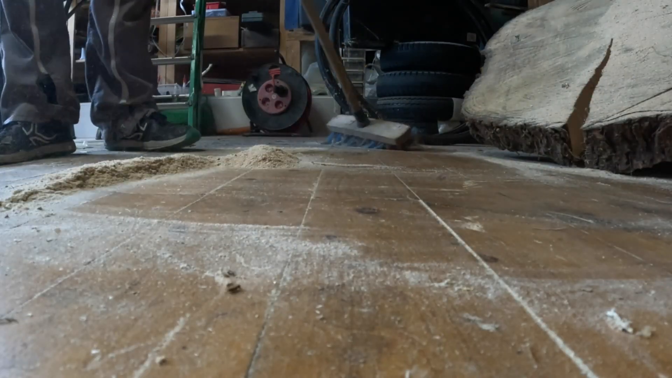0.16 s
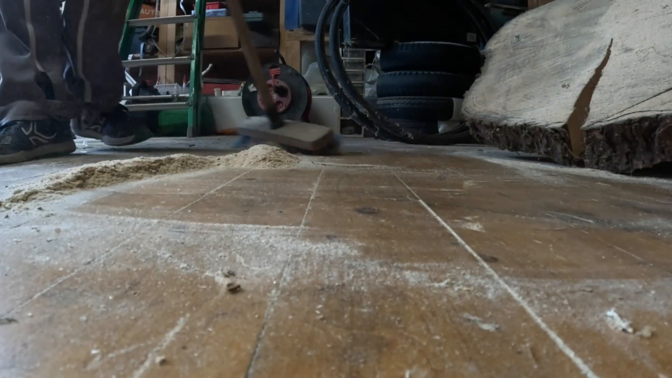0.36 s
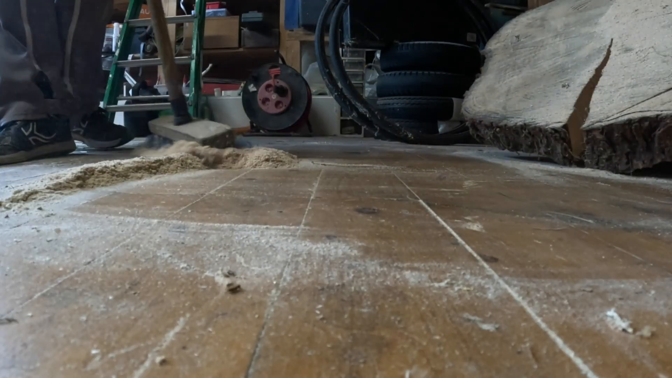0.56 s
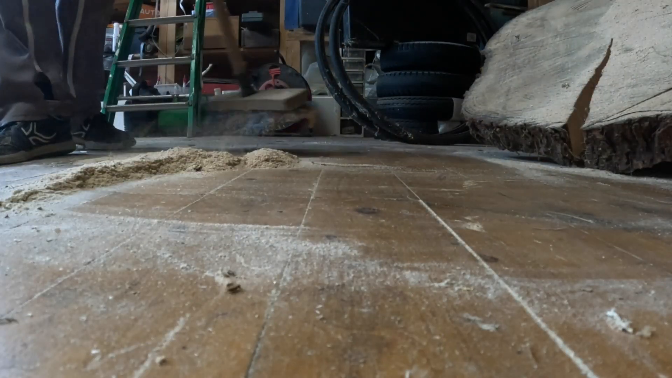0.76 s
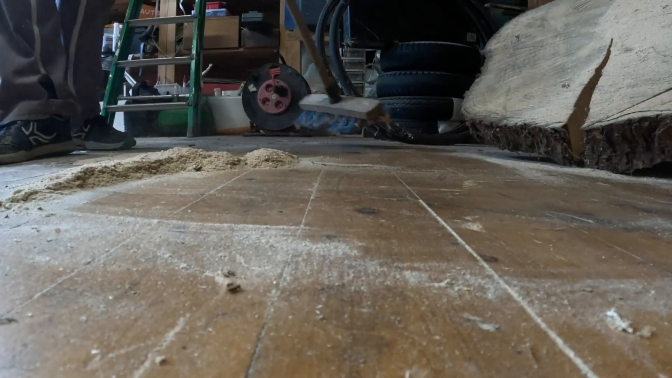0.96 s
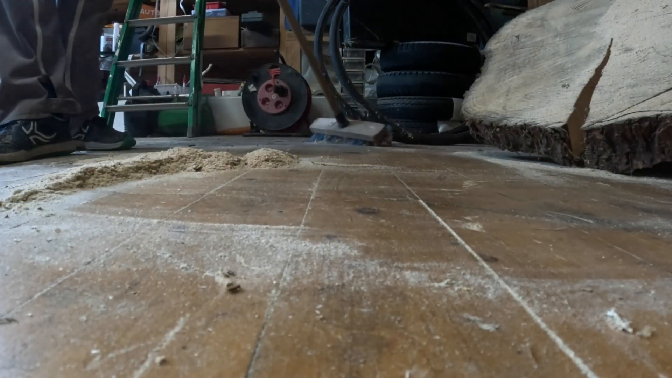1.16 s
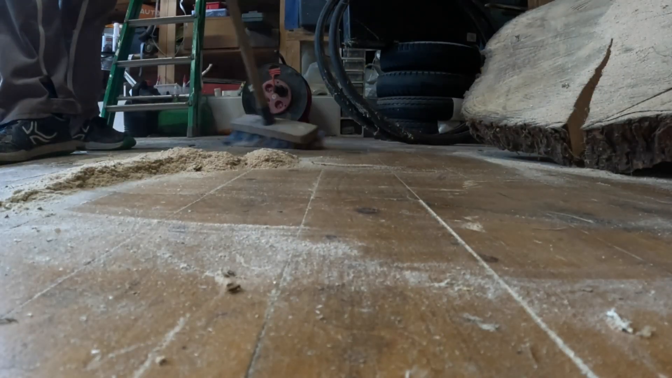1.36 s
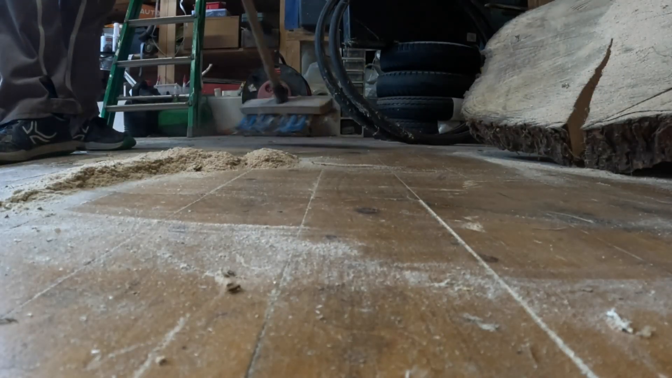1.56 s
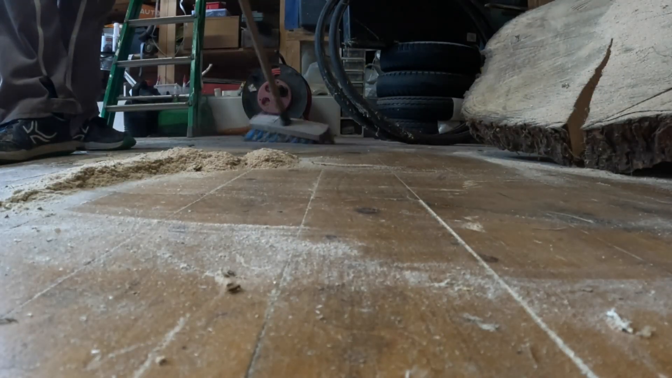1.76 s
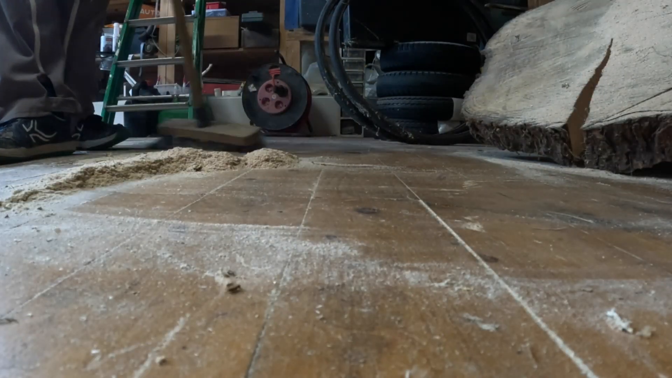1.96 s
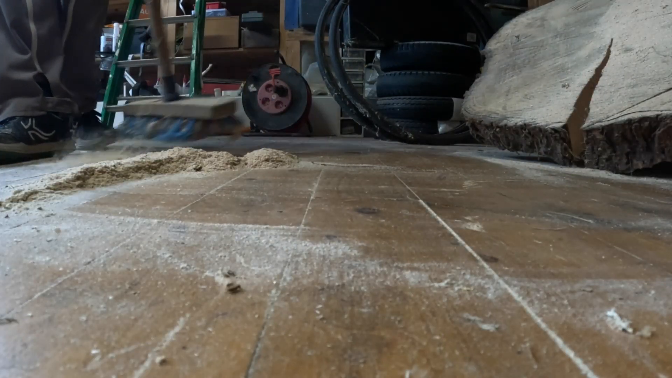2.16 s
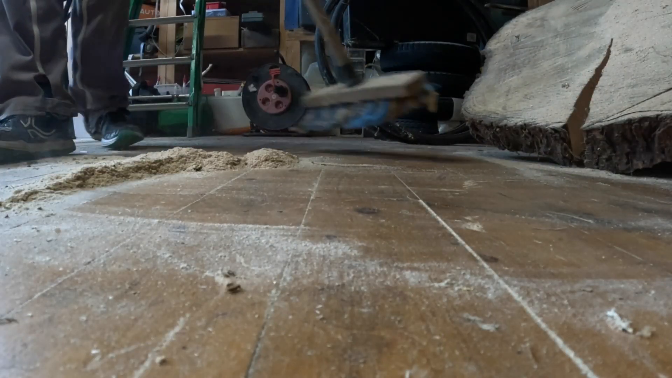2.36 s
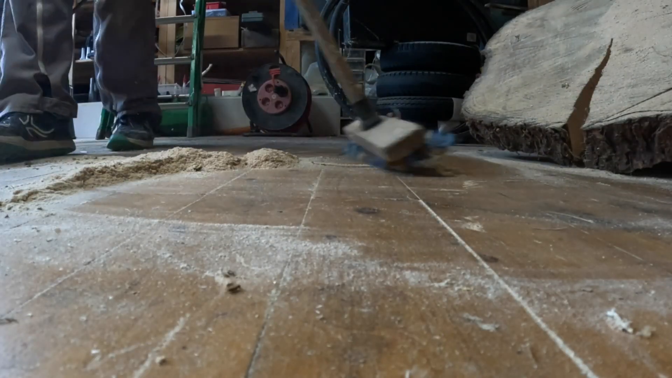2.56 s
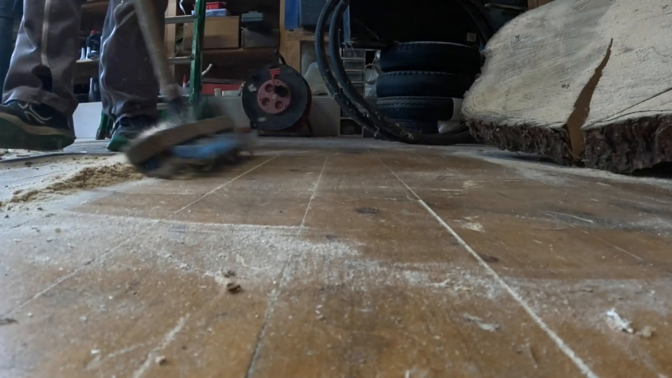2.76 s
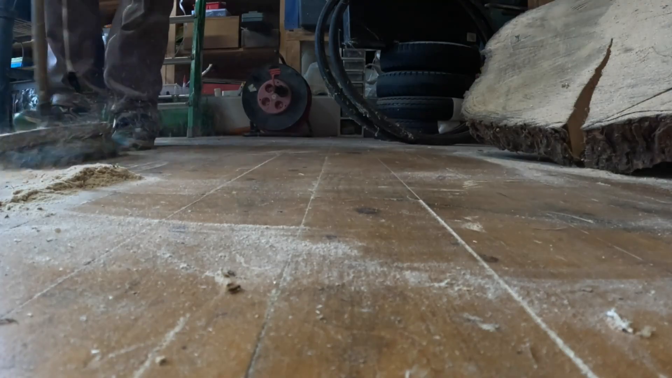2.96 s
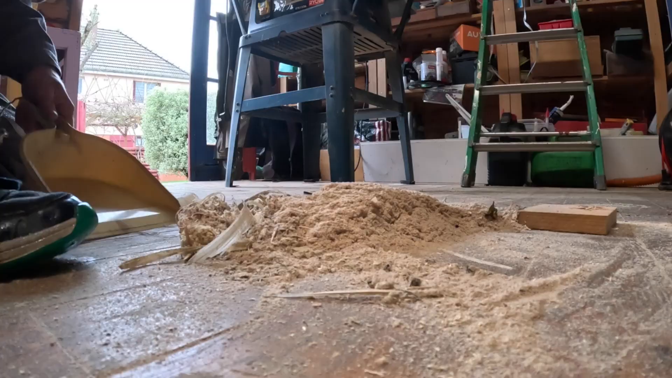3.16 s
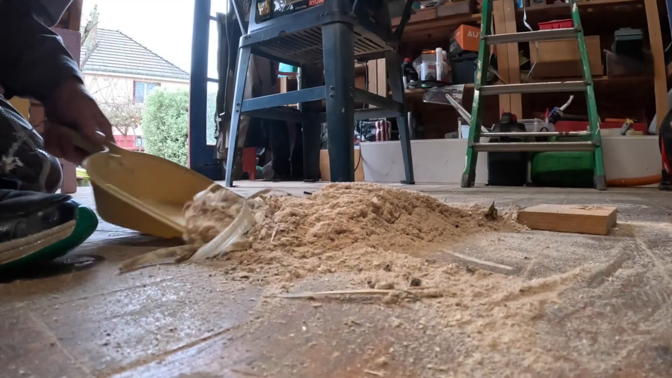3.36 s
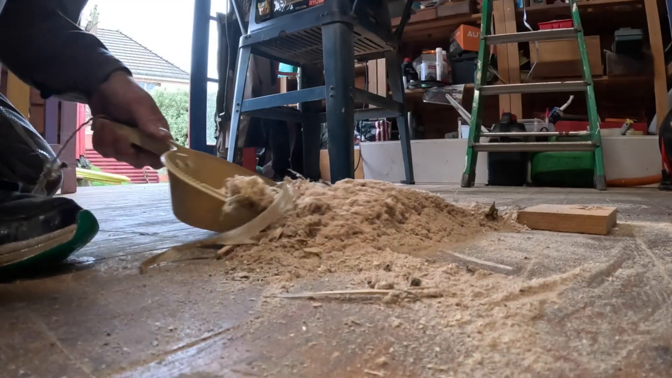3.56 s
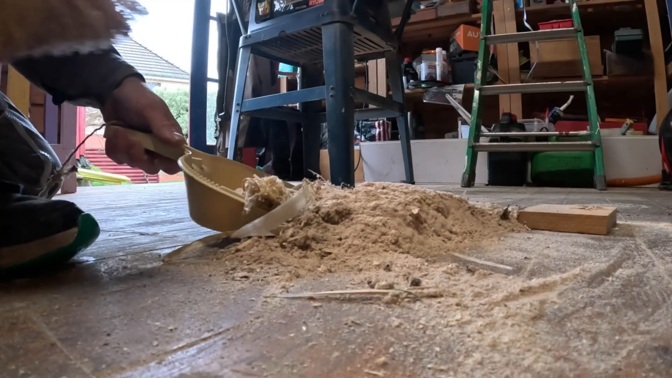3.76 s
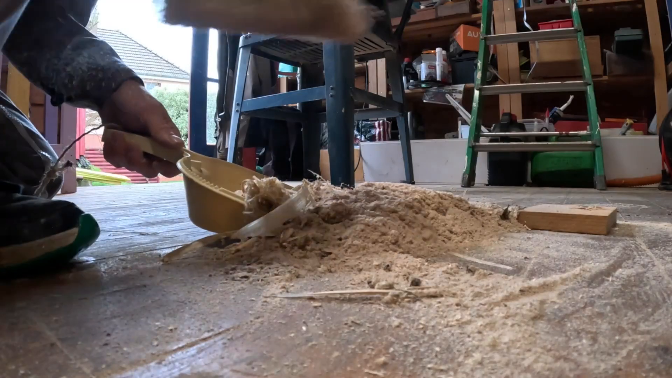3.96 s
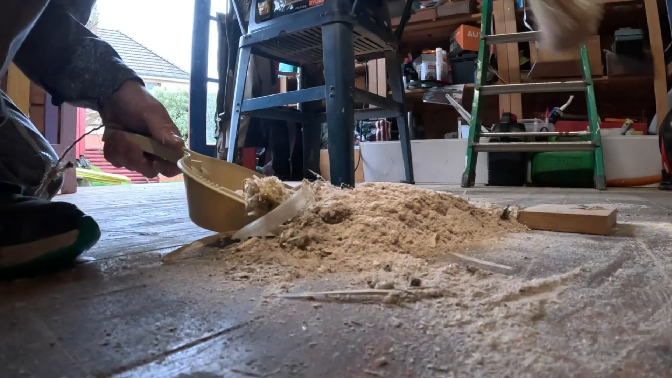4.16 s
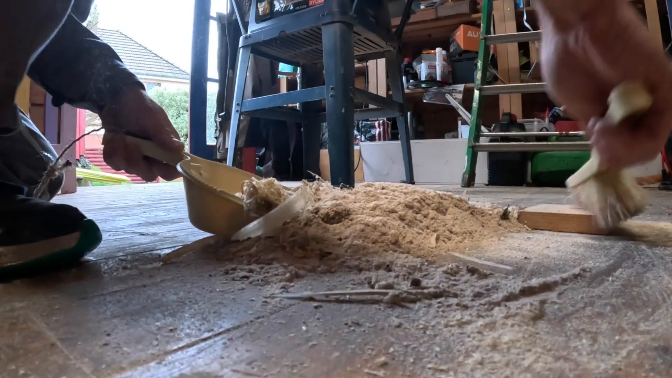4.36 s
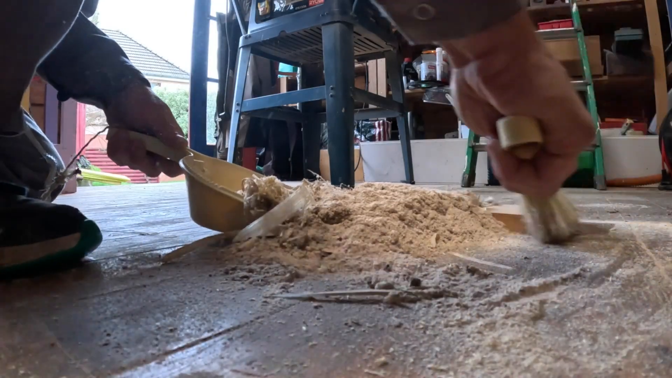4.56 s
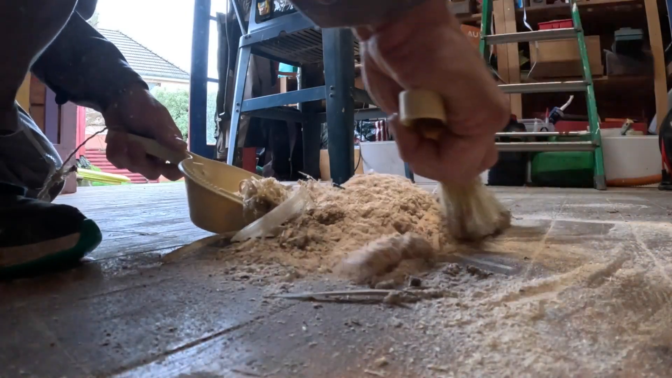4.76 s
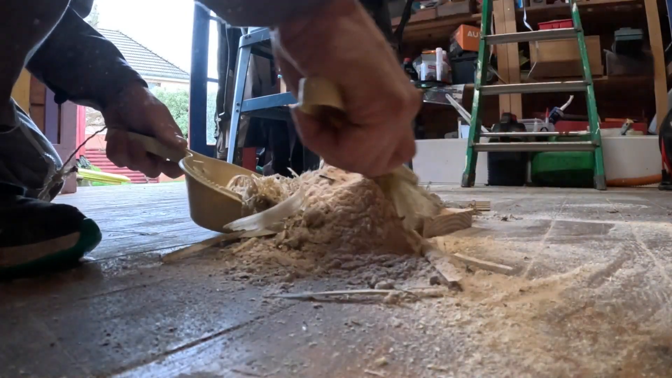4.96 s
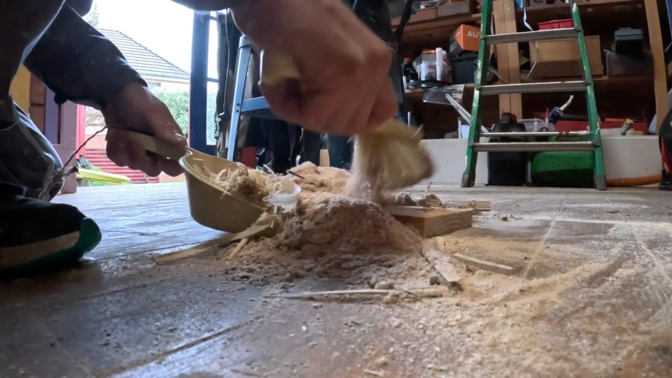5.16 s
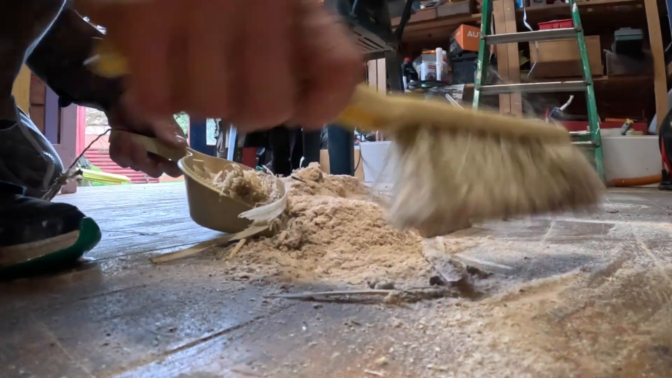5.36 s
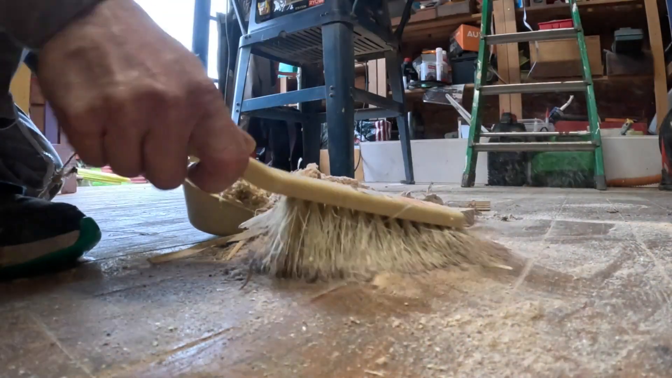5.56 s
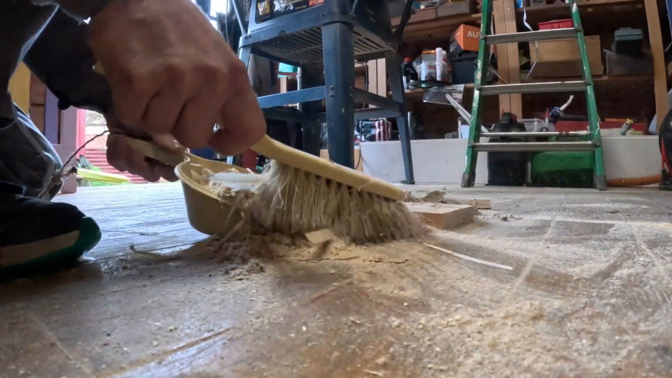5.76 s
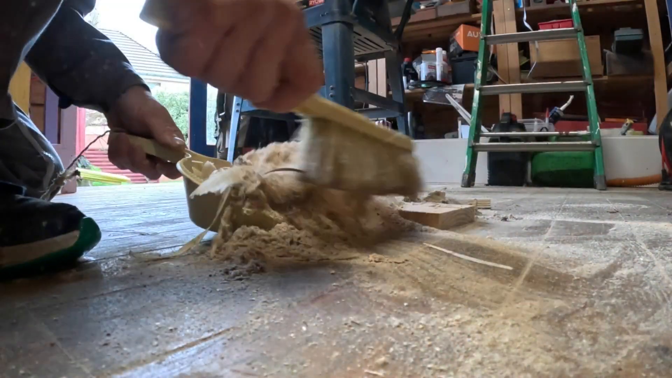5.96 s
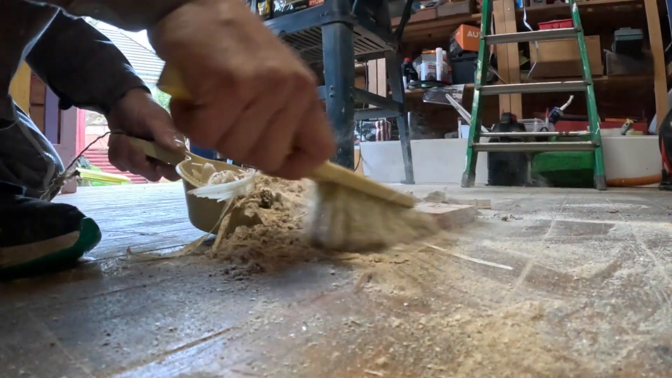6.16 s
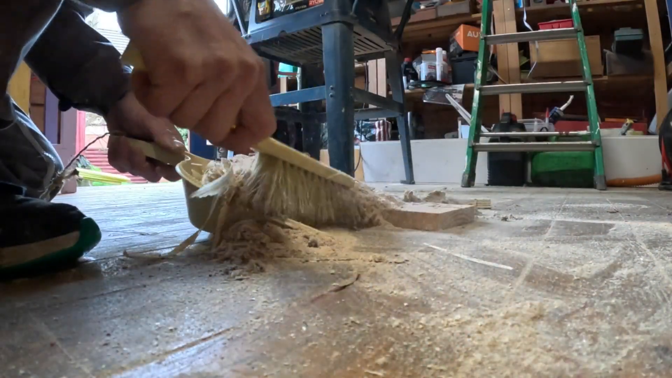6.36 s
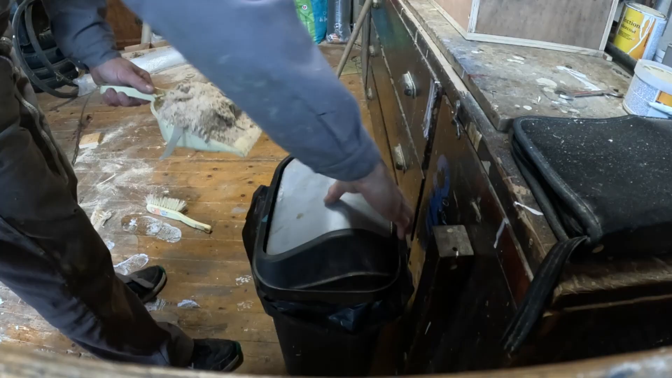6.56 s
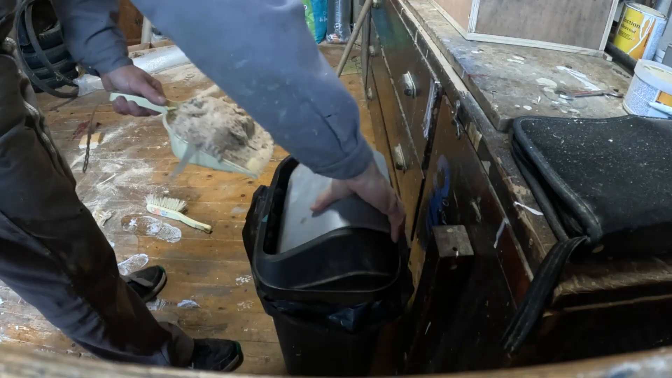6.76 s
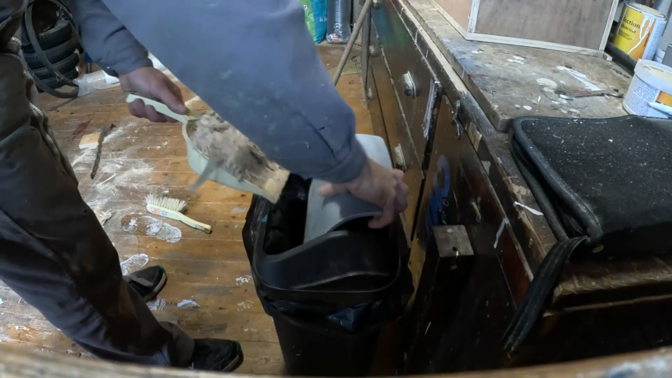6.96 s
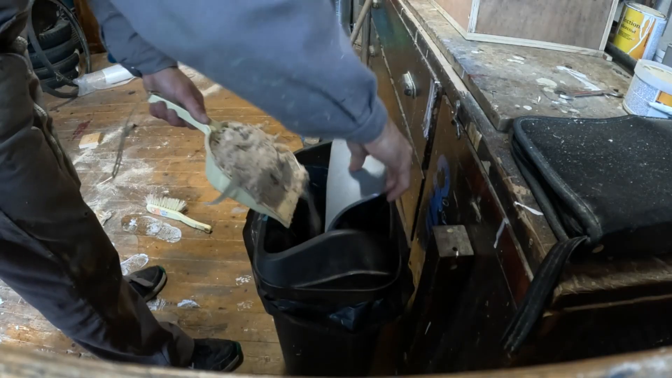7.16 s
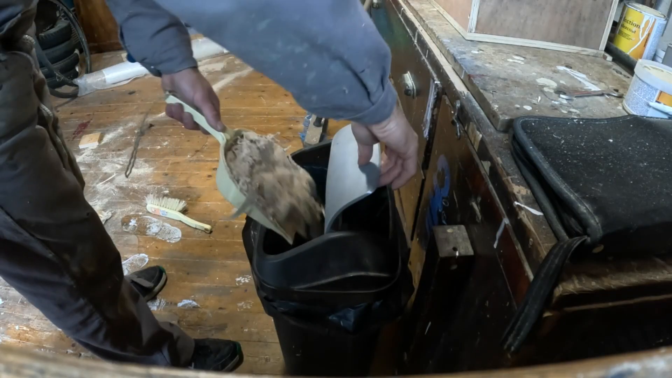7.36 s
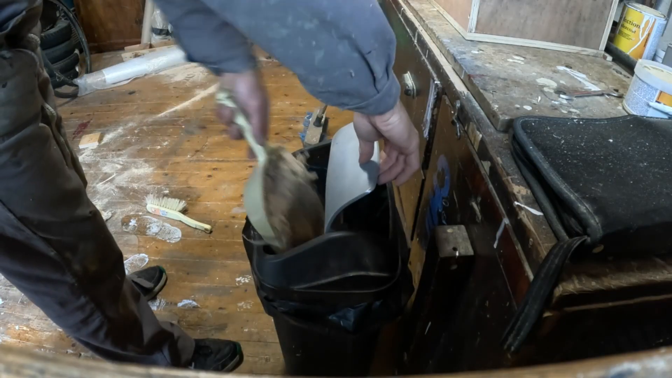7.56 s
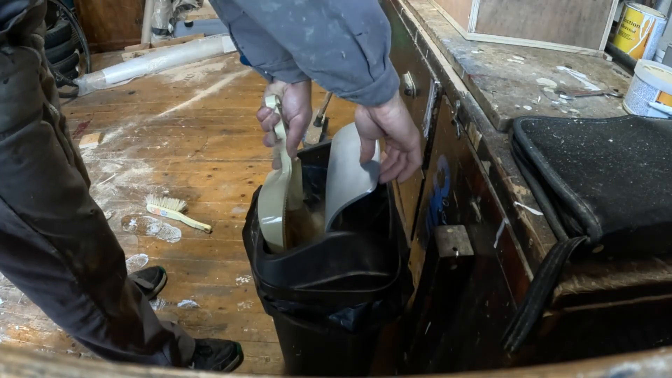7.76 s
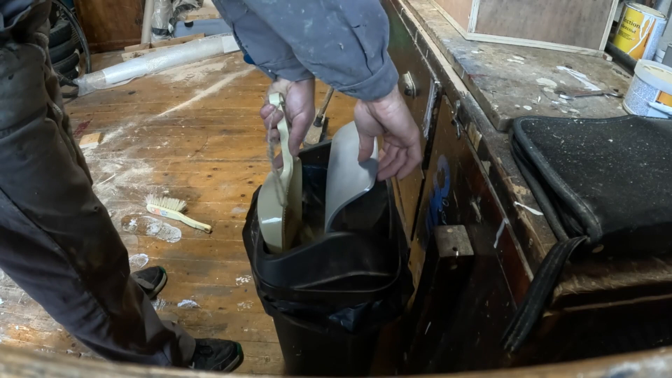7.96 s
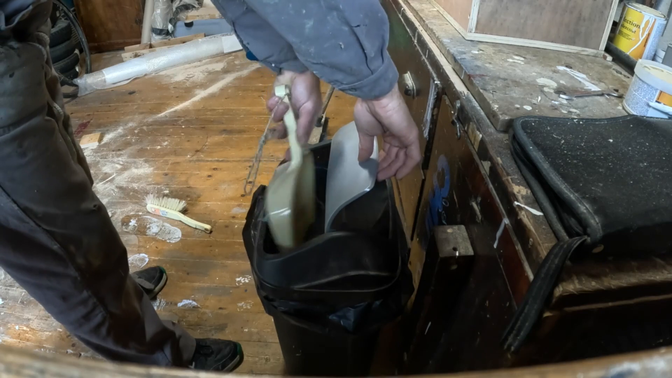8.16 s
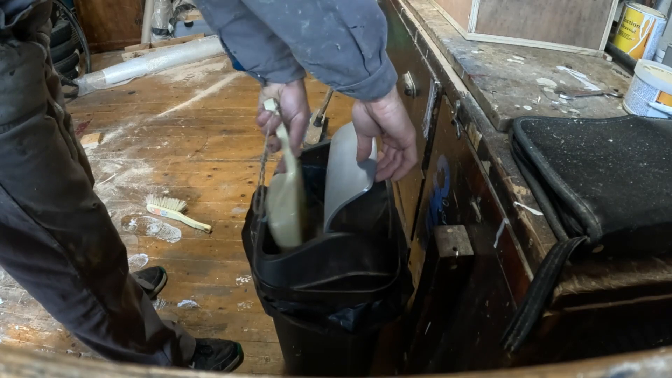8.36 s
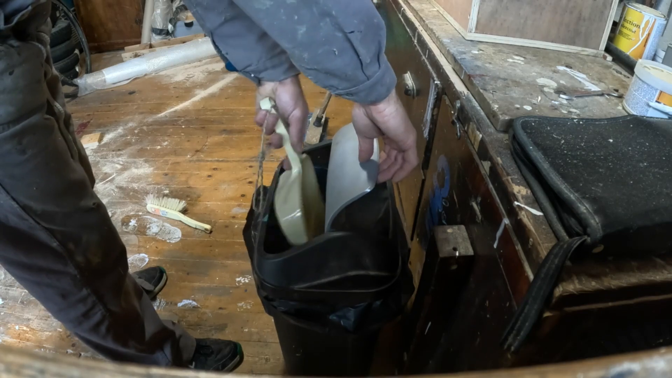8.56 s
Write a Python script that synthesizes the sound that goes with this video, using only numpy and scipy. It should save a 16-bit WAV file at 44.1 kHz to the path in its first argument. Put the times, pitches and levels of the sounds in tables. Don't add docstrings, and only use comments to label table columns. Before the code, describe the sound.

Coarse sweeping over wooden floorboards, a hollow dustpan scrape, dragging wood and soft brushing, then sawdust slides into a bin and two hard taps ring out.

```python
import sys
import numpy as np
from scipy import signal
from scipy.fft import rfft, irfft, next_fast_len
from scipy.io import wavfile
from scipy.ndimage import uniform_filter1d

SR = 44100
rng = np.random.default_rng(int(sys.argv[2]) if len(sys.argv) > 2 else 0)


def wav_record(signal):
    frames = np.transpose(np.atleast_2d(signal))
    bounded = np.clip(frames, -1, 1)
    quanta = np.round(bounded * 32767).astype(np.int16)
    wavfile.write(sys.argv[1], SR, quanta)


def volts_from_db(level):
    exponent = np.asarray(level, float) / 20
    return 10 ** exponent


N = 383475

# touch t/s, build-up t/s, hold t/s, lift-off t/s for 20 dB, pressure level/dB
BROOM_STROKES = [
    (-0.07, 0.037, .34, .15, -26),
    (-.08, .16, .04, .2, -23.5),
    (0.91, 0.22, 0.0037, 0.1448, -22),
    (1.525, .13, .15, .15, -24),
    (2.271, .002, .04, .06, -32),
    (2.265, 0.18, .2, 0.0756, -21.5),
    (2.3, 0.096, .39, 0.13, -28),
    (-0.02, 0.043, 2.67, 0.33, -42),
]
# f/Hz, level/dB per Hz
BROOM_TONE = [(88, -17.5), (150, 7), (786, -12), (1710, -11.5), (2210, -16), (6970, -15.5), (12500, -34.5),
              (15800, -58)]
# f/Hz, width f/Hz, strength level/dB
BROOM_HEAD = [(990, 140, -4.5), (1340, 200, -17.5), (1657, 31, -11), (3610, 160, -15)]


def broom():
    return rub(0, BROOM_STROKES, BROOM_TONE, BROOM_HEAD, slips_per_s=2500, spread_db=3.5, grit=0.8,
               judder_db=1.4, wide=0.45, patchy_db=2.0)


# touch t/s, build-up t/s, hold t/s, lift-off t/s for 20 dB, pressure level/dB
PAN_SHOVES = [
    (3.249, .001, 0.019, .05, -27.5),
    (3.28, .06, .1, 0.29, -10),
    (3.584, 0.0035, .02, .16, -15.5),
]
# f/Hz, level/dB per Hz
SHOVE_TONE = [(88, -33), (150, -9), (250, -5), (756, -12.5), (1440, -7), (2000, -15), (5740, -22),
              (15800, -56)]
# f/Hz, width f/Hz, strength
# level/dB
SHOVE_MODES = [(237, 42, -11), (955, 83, -11), (1380, 24, -12.5), (1470, 13, -7), (1730, 110, -16),
               (2500, 120, -28), (3300, 500, -8)]


def dustpan():
    return rub(1, PAN_SHOVES, SHOVE_TONE, SHOVE_MODES, slips_per_s=1200, spread_db=4, grit=0.9,
               judder_db=1.5, wide=0.25, patchy_db=2.1)


# touch t/s, build-up t/s, hold t/s, lift-off t/s for 20 dB, pressure level/dB
OFFCUT_DRAGS = [
    (4.432, .002, .005, 0.12, -34),
    (4.49, .05, .01, .05, -33),
    (4.541, .008, .02, 0.1, -22),
    (4.598, .004, .37, .045, -21.5),
    (4.7, .004, .01, .1, -22),
    (4.96, .02, .03, .1, -36),
]
# f/Hz, level/dB per Hz
DRAG_TONE = [(88, -40), (150, -8.5), (239, -2.5), (291, -2), (650, -16.5), (3020, -37), (9530, -48),
             (15800, -78)]
# f/Hz, width f/Hz, strength level/dB
OFFCUT_MODES = [(178, 33, -3.5), (240, 23, 0), (440, 82, -12), (1780, 47, -5), (2930, 180, -6),
                (3900, 160, -21)]


def offcut():
    return rub(2, OFFCUT_DRAGS, DRAG_TONE, OFFCUT_MODES, slips_per_s=1200, spread_db=3.5, grit=0.7,
               judder_db=1.5, wide=0.3, patchy_db=2.1)


# touch t/s, build-up t/s, hold t/s, lift-off t/s for 20 dB, pressure level/dB
BRUSH_STROKES = [
    (4.98, .06, .15, .06, -41),
    (5.2, .1, .25, .1, -50),
    (5.52, 0.096, 0.086, .13, -30),
    (5.75, .05, .14, 0.13, -42.5),
    (6.158, 0.062, 0.054, .35, -37.5),
]
BRUSH_RETURNS = [
    (5.8, 0.13, 0.0092, .07, -35),
    (6.094, 0.0018, 0.0023, 0.024, -31.5),
    (6.27, 0.089, 0.0079, 0.063, -21.5),
    (6.4, .05, .15, .05, -40),
]
# f/Hz, level/dB per Hz
BRUSH_TONE = [(88, -37), (150, -13), (235, -7), (502, -14.5), (1210, -9), (7540, -20.5), (12500, -32),
              (15800, -61)]
# f/Hz, width f/Hz, strength level/dB
BOARD_MODE = [(236, 18, -22)]


def hand_brush():
    return rub(3, BRUSH_STROKES, BRUSH_TONE, BOARD_MODE, slips_per_s=1500, spread_db=4, grit=0.7,
               judder_db=1.5, wide=0.35, patchy_db=2.1)


def hand_brush_returns():
    return rub(4, BRUSH_RETURNS, BRUSH_TONE, BOARD_MODE, slips_per_s=1500, spread_db=4, grit=0.7,
               judder_db=1.5, wide=0.3, patchy_db=2.1)


# touch t/s, build-up t/s, hold t/s, lift-off t/s for 20 dB, pressure level/dB
LID_RUBS = [
    (6.62, 0.19, .12, .1, -41.5),
    (6.97, .035, 0.0042, .045, -24),
    (7.03, 0.022, 0.26, .2, -43),
    (7.482, .002, .005, .12, -33.5),
    (7.577, 0.0013, 0.0043, 0.072, -27.5),
]
# f/Hz, level/dB per Hz
LID_TONE = [(88, -45), (150, -8), (201, -5), (447, -14), (1070, -9.5), (7840, -23.5), (15800, -47)]


def bin_lid():
    return rub(5, LID_RUBS, LID_TONE, [], slips_per_s=1500, spread_db=3, grit=0.55,
               judder_db=1.2, wide=0.25, patchy_db=2.4)


# start t/s, build-up t/s, hold t/s, fade t/s for 20 dB, level/dB
POUR_SLIDES = [
    (7.6, 0.093, 0.0085, 0.24, -32),
    (7.87, 0.099, 0.0079, .11, -30),
    (7.48, 0.13, 0.66, 0.31, -43.5),
]
# f/Hz, level/dB per Hz
POUR_TONE = [(88, -33), (150, -8), (465, -10), (817, -5.5), (7390, -19.5), (13800, -38.5), (15800, -57)]


def pour():
    return rub(6, POUR_SLIDES, POUR_TONE, [], slips_per_s=1200, spread_db=4.5, grit=0.7,
               judder_db=1.5, wide=0.25, patchy_db=2.4)


# from t/s, to t/s
SPANS = [
    (0, 3.19),
    (3.24, 3.86),
    (4.42, 5.12),
    (5.0, 6.6),
    (5.75, 6.6),
    (6.6, 7.75),
    (7.45, 8.45),
]
# firm fizz level/dB, slope dB/dB, firm board ring level/dB, slope dB/dB
FOLLOW = [
    (-28.5, 1.2, -31, 0.77),
    (-43, 1.33, -38.5, 1.36),
    (-37.5, 0.6, -22.5, 0.77),
    (-24, 1.05, -30, 0.73),
    (-40, 0.53, -37, 0.23),
    (-40.5, 0.58, -39.5, 0.24),
    (-32, 0.82, -29, 0.85),
]
# t/s, build-up t/s, fade t/s for 20 dB, level/dB
THUDS = [
    [(.04, 0.034, 0.26, -19.5), (.35, .08, 0.5, -26.5), (1.12, 0.019, 0.11, -17.5), (2.38, 0.085, 0.5, -20)],
    [(3.425, 0.004, 0.21, -13)],
    [(4.434, 0.004, 0.07, -17), (4.5, .03, .1, -24), (4.93, .03, .2, -19), (4.543, .005, 0.04, -8.5),
     (4.598, 0.0029, 0.08, -8.5), (4.7, 0.0013, 0.06, -14.5)],
    [(5.66, 0.049, 0.1, -20)],
    [(6.158, .002, 0.35, -30.5)],
    [(6.75, 0.046, 0.4, -34.5), (7.482, 0.0034, 0.12, -25), (7.577, .002, 0.06, -17)],
    [],
]


def rub(index, rows, tone, modes, slips_per_s, spread_db, grit, judder_db, wide, patchy_db):
    span = SPANS[index]
    fizz_db, fizz_slope, ring_db, ring_slope = FOLLOW[index]
    t = np.arange(*span, 1 / SR)
    level_db = pushes(t, rows, lift=1.78)
    over_firm_db = level_db + 25
    fizz = volts_from_db(fizz_db + fizz_slope * over_firm_db)
    thud = volts_from_db(pushes(t, THUDS[index], lift=1))
    weight = np.hypot(volts_from_db(ring_db + ring_slope * over_firm_db), thud)

    def contact(share):
        hiss = rng.standard_normal(len(t))
        slipping = rng.random(len(t)) < slips_per_s / SR
        size = np.minimum(rng.exponential(1, len(t)), 3)
        slips = slipping * volts_from_db(spread_db * size) * np.sign(hiss)
        judder = volts_from_db(share * judder_db * wander(len(t), 0.015))
        drive = (hiss + share * grit * evened(slips)) * judder
        ringing = sum(volts_from_db(7.0 + db) * resonate(drive, hz, width) for hz, width, db in modes)
        return colour(drive + ringing, tone)

    def heard(x):
        throb = volts_from_db(judder_db * wander(len(t), 0.014))
        ring = weight * throb * evened(band(x, 100, 432))
        body = volts_from_db(level_db) * evened(band(x, 556, 2540))
        return body + fizz * evened(band(x, 2900, 18000)) + ring

    mid = heard(contact(1))
    side = wide * band(heard(contact(0.73)), 1500, 10500)
    ends = np.clip(np.minimum(t - t[0], t[-1] - t) * 1000, 0, 1)
    return span[0], clump(np.array([mid + side, mid - side]), patchy_db) * ends


def pushes(times, rows, lift):
    t = times[::16]
    power = np.full(len(t), 1e-9)
    for s, rise, *hold, fall, db in rows:
        gone = (t - s - rise - sum(hold)) / fall
        build = np.clip((t - s) / rise, 0, 1) ** (2 * 0.91)
        release_db = 40 * np.clip(gone, 0, 3) ** lift
        power = power + volts_from_db(2 * db - release_db) * build * (gone < 3)
    return np.interp(times, t, 10 * np.log10(power))


def clump(x, patchy_db):
    z = signal.stft(x, nperseg=256, noverlap=192)[2]
    patches = uniform_filter1d(rng.standard_normal(z.shape[1:]), 4, 0)
    patches = evened(uniform_filter1d(patches, 16, 1))
    return signal.istft(z * volts_from_db(patchy_db * patches), nperseg=256, noverlap=192)[1][:, :x.shape[1]]


# t/s, peak level/dB, ring length factor, brightness level/dB
TAPS = [
    (5.5, -21.5, 0.27, -4),
    (6.093, -20.5, 0.28, -5),
    (6.158, -17, 0.45, -3),
    (7.482, -20, 0.5, -18),
    (7.576, -16, 0.5, -13),
    (8.392, 3.5, 0.56, -2.5),
    (8.558, 4, 0.62, -3),
]
# f/Hz, level/dB per Hz
TAP_TONE = [(76, -27.5), (130, -0.5), (252, -5.5), (480, -12), (894, -8), (2590, -15.5), (7990, -29),
            (15800, -59)]
# f/Hz, level/dB, t60 t/s
BIN_MODES = [(229, -10, 0.5), (425, -9, .5), (608, -10, .4), (705, -8, .35), (788, -3, 0.6), (964, -8, .4),
             (1170, -6, 0.3), (1357, -9, .3), (1530, -8, 0.4), (1663, -8, .4), (1950, -4, 0.25),
             (2400, -8, 0.3), (2680, -7, 0.2), (3200, -9, .12)]


def tap(db, ring, bright_db):
    t = np.arange(SR // 2) / SR

    def dying(t60):
        return volts_from_db(-60 * t / (t60 * ring))

    noise = evened(colour(rng.standard_normal(len(t)), TAP_TONE))
    treble = band(noise, 2600, 16000)
    body = (noise - treble) * (dying(0.07) + 0.5 * dying(0.5))
    top = volts_from_db(bright_db) * treble * (1.6 * dying(0.09) + 0.3 * dying(0.45))
    rattle = (body + top) * volts_from_db(1.8 * wander(len(t), 0.0035))
    modes = 0
    for hz, mode_db, t60 in BIN_MODES:
        modes = modes + volts_from_db(mode_db) * dying(0.5 * t60) * np.sin(2 * np.pi * (hz * t + rng.random()))
    return volts_from_db(db - 5) * (rattle + 0.4 * modes) * np.minimum(t / 0.0008, 1)


# t/s, peak level/dB, f/Hz, hold t/s
CATCHES = [(.458, -14, 106, 0.023), (1.134, -16, 240, 0.025), (3.337, -15.5, 1380, 0.035),
           (3.34, -10, 237, .046), (3.38, -7.5, 1470, 0.026), (3.428, -5, 237, 0.051),
           (3.593, -7, 237, 0.03), (4.545, -5, 250, 0.02), (4.599, -3, 237, 0.0246),
           (4.895, -14, 182, 0.025), (4.698, -15, 440, 0.026), (5.688, -17, 236, 0.053),
           (6.982, -40, 1110, 0.03), (1.15, -17, 90, .05), (2.5, -21, 270, .04), (2.505, -11, 33, .09),
           (2.6, -8, 64, .035), (3.287, -14, 1450, .015), (3.32, -12, 1400, .02), (4.658, -11, 262, .02),
           (4.813, -16, 180, .02), (4.852, -12, 200, .03), (4.925, -12, 240, .02), (7.578, -18, 280, .04),
           (7.69, -32, 1400, .03)]


def catch(db, hz, hold):
    t = np.arange(8000) / SR
    fade_db = -60 * np.maximum(t - hold, 0) / 0.045
    swing = np.minimum(t / 0.004, 1) * volts_from_db(fade_db + 2.5 * wander(len(t), 0.005))
    turns = np.cumsum(hz * (1 + 0.046 * wander(len(t), 0.0031))) / SR
    return volts_from_db(db) * swing * np.sin(2 * np.pi * turns)


# t/s, peak level/dB, f/Hz, crack level/dB above it
TICKS = [(0.947, -16, 1230, -14), (0.968, -12, 1000, -20), (2.312, -15.5, 1700, -11),
         (2.452, -1.5, 1300, -36), (2.645, -6, 1304, -25), (3.293, 0, 1427, -29), (3.323, 4, 1365, -11),
         (3.43, -6, 1530, -30), (3.502, 0, 927, -25), (3.52, -2, 696, -11.5), (3.584, -2, 890, -26),
         (3.876, -21, 1030, -26), (4.433, -21, 1050, -1), (4.548, -9, 600, -36), (4.601, -7, 560, -40),
         (4.701, -6, 620, -40), (4.829, -10, 910, -17), (5.069, -26, 775, -2), (5.686, -9.5, 1620, -7),
         (5.751, -24, 750, -1), (5.779, -22.5, 1100, 2.5), (5.812, -24.5, 1420, 3.5),
         (5.898, -19, 1490, -11), (6.198, -14.5, 1000, -16), (6.457, -12.5, 1620, -22),
         (6.981, -17, 1120, -30), (7.969, -12.5, 855, -18)]


def tick(db, hz, crack_db):
    t = np.arange(4000) / SR
    puff, sharp = rng.standard_normal((2, len(t)))
    pitch = np.sin(2 * np.pi * hz * t)
    knock = (pitch + 0.66 * evened(band(puff, 333, 3400))) * volts_from_db(-60 * t / 0.057)
    crack = evened(band(sharp, 3100, 10000)) * volts_from_db(crack_db + 8.0 - 60 * t / 0.018)
    return volts_from_db(db - 10) * (knock + crack)


# t/s, peak level/dB, f/Hz
SNAPS = [(0.8834, -27, 4000), (1.5125, -27, 5500), (1.5429, -27, 4000), (2.0467, -30, 4500),
         (2.3121, -18, 3500), (3.25, -23, 2500), (3.5184, -8, 4500), (3.8117, -31, 4000),
         (4.375, -35, 4000), (4.5595, -22, 4000), (4.8299, -16, 3000), (4.945, -22, 4000),
         (5.5498, -25, 3500), (5.7778, -21, 5500), (5.8112, -23, 5500), (5.9224, -25, 3000),
         (6.0965, -25, 1800), (6.1609, -24, 3000), (6.355, -18, 3500), (6.4572, -17, 2600),
         (6.5136, -30, 3000), (6.765, -31, 3500), (7.4824, -21, 2500), (7.5782, -14, 2200),
         (7.75, -24, 4000), (7.8067, -27, 3500), (8.2666, -33, 3500)]


def snap(db, hz):
    t = np.arange(600) / SR
    burst = rng.standard_normal((3, len(t))) * volts_from_db(-60 * t / 0.012)
    click = burst[0] + 0.4 * burst[1:]
    click = resonate(resonate(click, hz, 1.2 * hz), hz, 1.2 * hz)
    return volts_from_db(db) * click / abs(click).max()


# t/s, length t/s,
# level/dB, centre f/Hz, width f/Hz
RUSTLES = [(0.877, .06, -37.5, 3480, 3500), (3.783, 0.68, -43.5, 313, 250), (3.84, .19, -48.5, 6000, 3500),
           (4.219, 0.26, -51, 4840, 5000), (5.116, 0.093, -43, 2700, 500), (7.055, 0.29, -44, 3860, 1800),
           (7.047, .25, -48.5, 7500, 5000), (7.906, .15, -39.5, 7500, 1500), (.03, .03, -27, 1050, 300),
           (.08, .05, -27, 900, 700), (.295, .04, -29, 1650, 300), (.3, .04, -30, 1000, 300),
           (1.09, .06, -28, 1300, 900), (1.68, .07, -29, 1000, 500), (2.42, .05, -25, 1200, 900),
           (2.63, .035, -22, 1300, 900), (2.7, .1, -30, 1050, 500), (3.285, .2, -25, 1400, 600),
           (3.5, .09, -22, 1100, 900), (3.25, .035, -36, 1500, 1500), (3.6, .13, -24, 1350, 700),
           (4.7, .27, -34, 1800, 500), (5.81, .17, -38, 1500, 1100), (6.3, .11, -29, 1300, 900),
           (6.51, .08, -39, 1600, 1300), (7.65, .09, -37, 2400, 1200), (8.38, .013, -34, 2500, 3000),
           (8.543, .016, -34, 1500, 1500)]


def rustle(length, db, hz, width):
    swish = resonate(rng.standard_normal((3, round(length * SR))), hz, width)
    swish = evened(resonate(swish[0] + 0.5 * swish[1:], hz, width))
    size = swish.shape[1]
    return volts_from_db(db + 1.9 * wander(size, 0.0084)) * swish * signal.windows.tukey(size, 0.5)


# t/s, build-up t/s, fade t/s for 20 dB, level/dB
LOADS = [(.0, 0.098, 0.4, -10), (.36, .12, 1.1, -19.5), (.95, 0.25, 0.35, -20.5), (1.7, .2, 2, -24),
         (2.4, 0.1, 0.5, -11.5), (4.45, 0.33, 0.5, -26), (5.28, .14, 1.0, -23.5), (7.18, 0.057, .5, -27.5),
         (7.72, 0.13, 1.5, -28.5), (8.33, 0.096, 0.3, -22), (8.51, 0.088, 0.3, -18.5)]
# f/Hz, level/dB per Hz
RUMBLE_TONE = [
    [(7.1, -26), (12, 1), (56, 5), (139, -10.5), (200, -13), (260, -50.5), (440, -120)],
    [(7.1, -52), (12, 6.5), (43, -7.5), (107, 2), (140, -3.5), (200, -6), (260, -36), (440, -120)],
    [(7.1, -56), (12, -10), (54, 1), (77, -6.5), (96, -15), (200, -15), (260, -17.5), (440, -120)],
]
SETTLED_DB = [-28.5, -34.5, -33.5]


def rumble(shot, t):
    load = np.hypot(volts_from_db(SETTLED_DB[shot]), volts_from_db(pushes(t, LOADS, lift=1)))
    shaking = pair(RUMBLE_TONE[shot], side_db=-12.5, size=len(t))
    return shaking * load * volts_from_db(2.0 * wander(len(t), 0.02))


# f/Hz, t60 t/s
ROOM_T60 = [(100, 0.41), (500, 0.31), (2000, 0.13), (6000, 0.23), (14000, 0.42)]


def room(x):
    taps = np.zeros((2, SR // 2))
    slots = np.arange(160, SR // 2 - 20, 20)
    at = slots + rng.integers(0, 20, (2, len(slots)))
    np.put_along_axis(taps, at, rng.choice([-1., 1.], at.shape), 1)
    taps[1] = 0.5 * taps[0] + 0.56 * taps[1]
    hz, t, z = signal.stft(taps, SR, nperseg=256)
    decay = volts_from_db(-60 * t / read(ROOM_T60, hz)[:, None])
    tail = signal.istft(z * decay, SR, nperseg=256)[1]
    shared = tail.mean(0)
    tail = band(tail - shared, 380, 17300) + shared
    return signal.oaconvolve(x[None], tail / np.linalg.norm(tail[0]), axes=1)[:, :len(x)]


# f/Hz, level/dB per Hz
AIR_TONE = [
    [(88, -36), (150, -7), (380, -15.5), (451, -3), (6310, -27), (11400, -54), (14000, -77)],
    [(88, -29), (150, -16), (309, -4.5), (468, -25.5), (1000, -13.5), (1670, -23), (7000, -36.5),
     (14000, -60)],
    [(88, -22), (150, -16), (327, -30), (2400, -26), (2790, -27), (14000, -56)],
]
AIR_DB = [-46, -39, -50.5]


def air(shot, size):
    drift_db = 0.78 * wander(size, 0.061)
    return pair(AIR_TONE[shot], side_db=-17, size=size) * volts_from_db(AIR_DB[shot] + drift_db)


def pair(tone, side_db, size):
    mid, side = colour(rng.standard_normal((2, size)), tone)
    side = volts_from_db(side_db) * side
    return evened(np.array([mid + side, mid - side]))


def evened(x):
    return x / np.sqrt(np.mean(x ** 2) + 1e-20)


def read(points, hz):
    f, value = np.transpose(points)
    return np.interp(np.log(hz + 1), np.log(f + 1), value)


def add(mix, s, sound):
    part = mix[:, round(s * SR):][:, :sound.shape[-1]]
    part += sound[..., :part.shape[-1]]


def colour(x, tone):
    if x.ndim > 1:
        return np.array([colour(channel, tone) for channel in x])
    gain_db = np.maximum(read(tone, abs(np.fft.fftfreq(8192, 1 / SR))), -100)
    spectrum = np.exp(np.conj(signal.hilbert(np.log(volts_from_db(gain_db)))))
    taps = np.fft.ifft(spectrum).real[:4096]
    return signal.oaconvolve(x, taps)[:len(x)]


def resonate(x, hz, width):
    return signal.lfilter(*signal.iirpeak(hz, hz / max(width, 1), SR), x)


def band(x, low_hz, high_hz):
    return signal.sosfilt(signal.butter(3, [low_hz, high_hz], "bandpass", fs=SR, output="sos"), x)


def wander(size, s):
    width = int(s * SR)
    return evened(uniform_filter1d(uniform_filter1d(rng.standard_normal(size), width), width))


CUTS = [
    0,
    3.19,
    6.595,
    8.7,
]
WET_DB = [-7, -8.5, -8]
PAN_DB = [-0.2, -1.5, -1]


def scene():
    near = np.zeros((2, N))
    for contact in (broom, dustpan, offcut, hand_brush, hand_brush_returns, bin_lid, pour):
        add(near, *contact())
    for make, rows in [(tap, TAPS), (catch, CATCHES), (tick, TICKS), (snap, SNAPS), (rustle, RUSTLES)]:
        for s, *settings in rows:
            add(near, s, make(*settings))
    edges = [min(round(s * SR), N) for s in CUTS]
    shots = []
    for k in range(3):
        x = near[:, edges[k]:edges[k + 1]]
        t = np.arange(edges[k], edges[k + 1]) / SR
        direct = x * volts_from_db(np.array([[0.5], [-0.5]]) * PAN_DB[k])
        reflected = volts_from_db(WET_DB[k]) * room(x.mean(0))
        shots.append(direct + reflected + rumble(k, t) + air(k, len(t)))
    return np.concatenate(shots, axis=1)


def roll_off(x):
    return signal.sosfilt(signal.butter(12, 15960, fs=SR, output="sos"), x)


# f/Hz, phase/radians
LEAD = [(0, 0.29), (3190, -0.44), (7150, -0.84), (15100, -0.49), (15500, -0.1)]
# f/Hz, level/dB
LEAN = [(60, -1.2), (180, 0.5), (550, 0), (1650, 1.2), (4500, 4.2), (9000, 0.3)]
# f/Hz, width f/Hz, level/dB
HOUSING = (11000, 840, -5.5)


def record(dry):
    size = next_fast_len(N)
    hz = np.fft.rfftfreq(size, 1 / SR)
    half = volts_from_db(read(LEAN, hz) / 2) * np.exp(1j * read(LEAD, hz) / 2)
    notch_hz, notch_width, notch_db = HOUSING
    notch = volts_from_db(notch_db * np.exp(-((hz - notch_hz) / notch_width) ** 2))
    ports = irfft(rfft(dry, size) * notch * np.array([half, 1 / half]), size)[:, :N]
    return roll_off(np.clip(ports, -0.94, 0.94))


dry = scene()
out = record(dry)
wav_record(out)
```